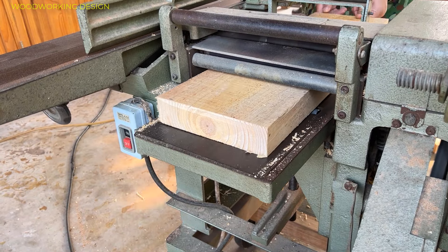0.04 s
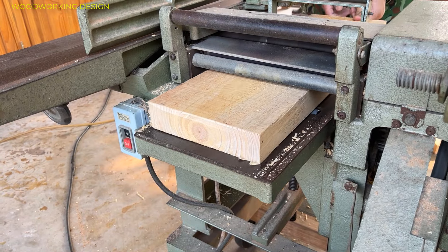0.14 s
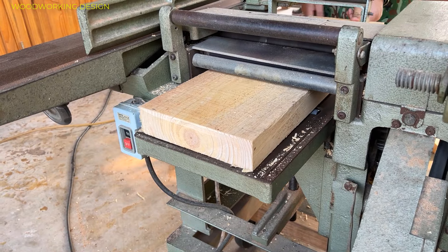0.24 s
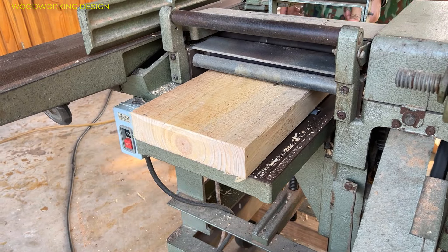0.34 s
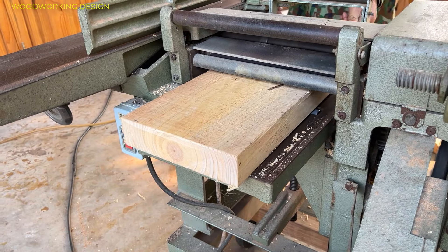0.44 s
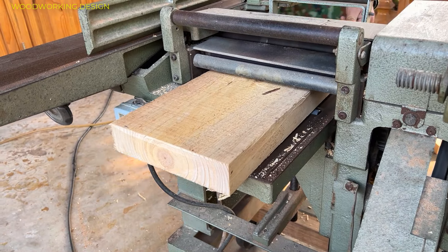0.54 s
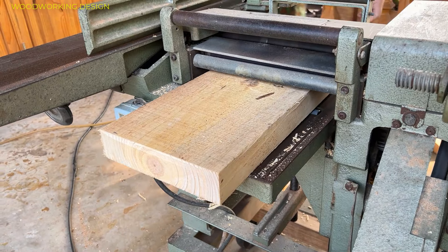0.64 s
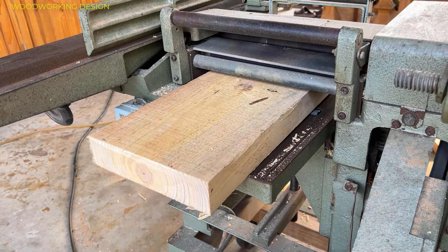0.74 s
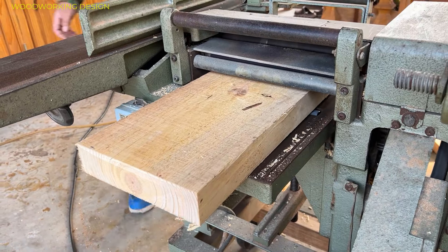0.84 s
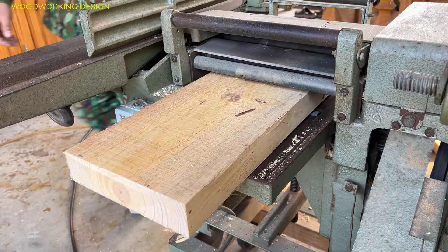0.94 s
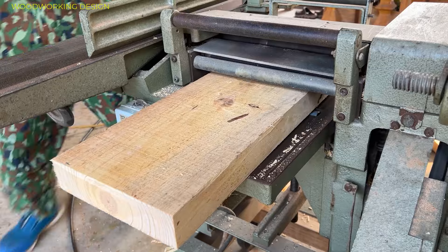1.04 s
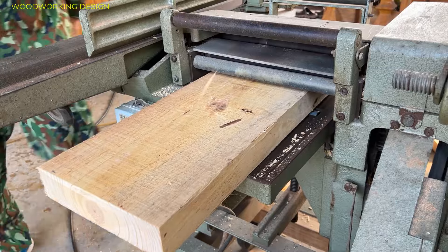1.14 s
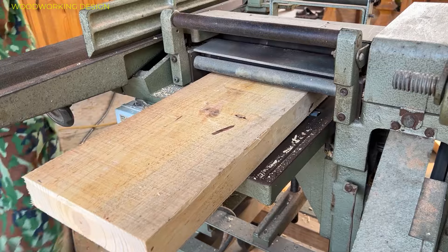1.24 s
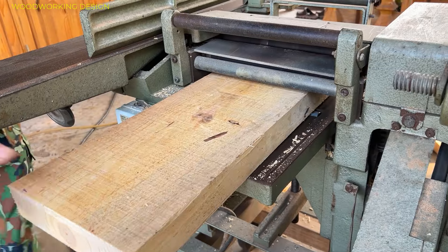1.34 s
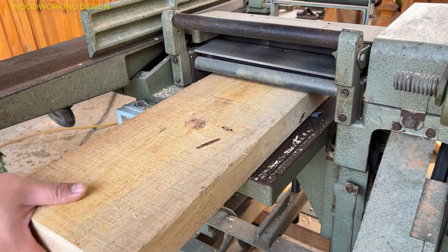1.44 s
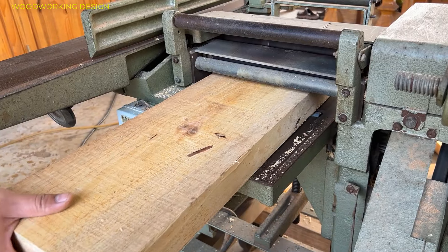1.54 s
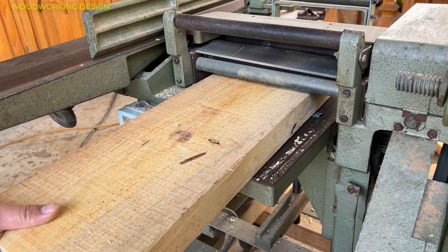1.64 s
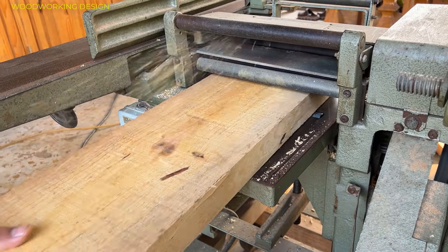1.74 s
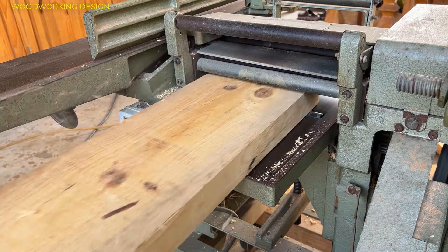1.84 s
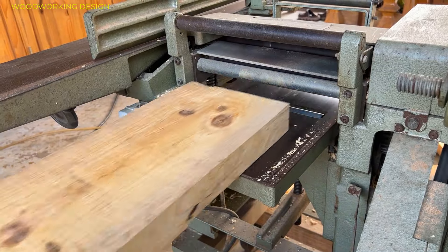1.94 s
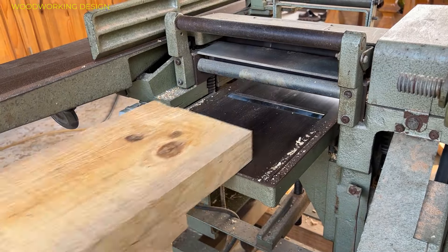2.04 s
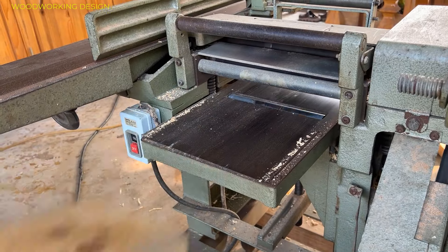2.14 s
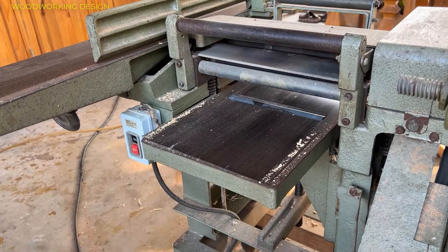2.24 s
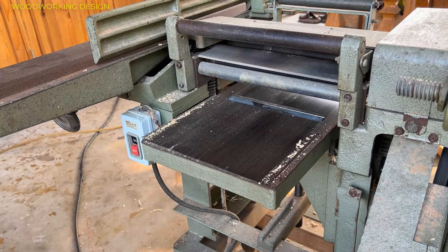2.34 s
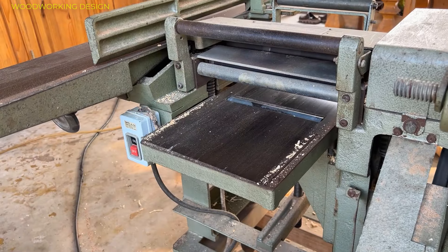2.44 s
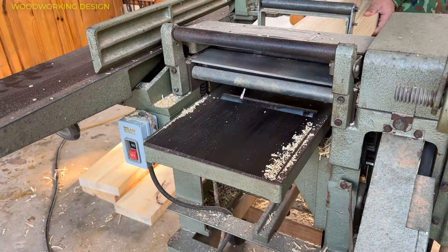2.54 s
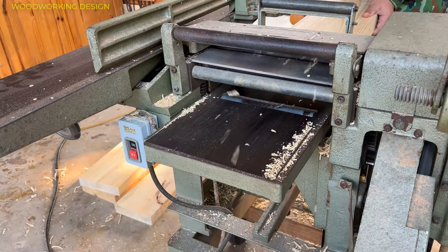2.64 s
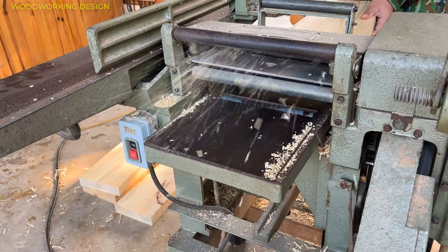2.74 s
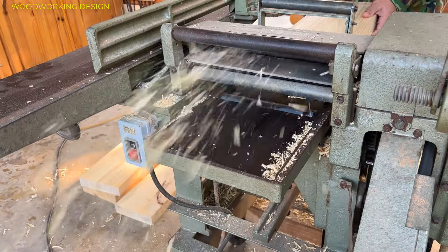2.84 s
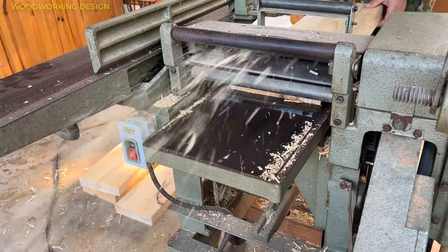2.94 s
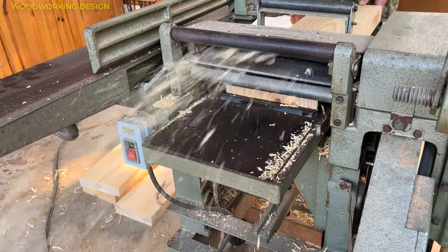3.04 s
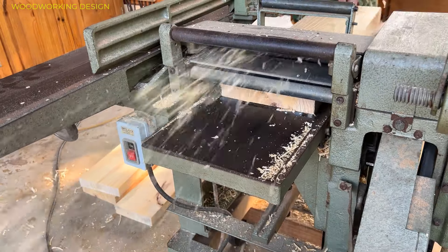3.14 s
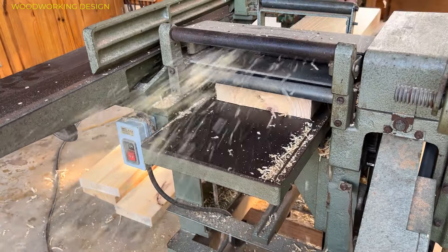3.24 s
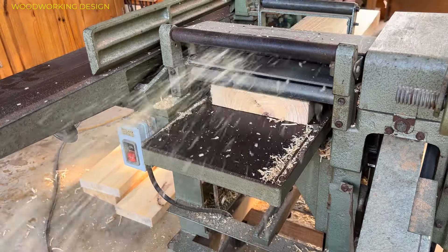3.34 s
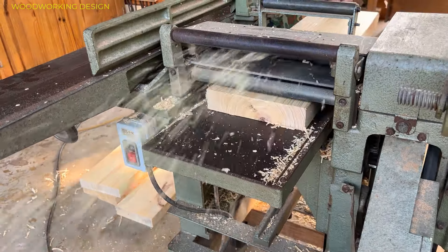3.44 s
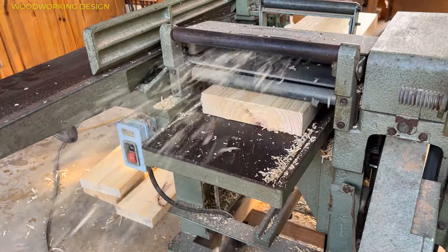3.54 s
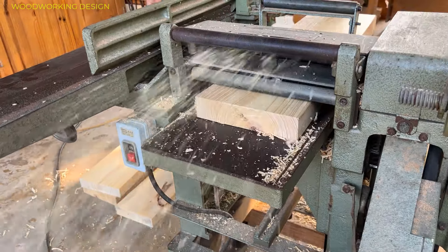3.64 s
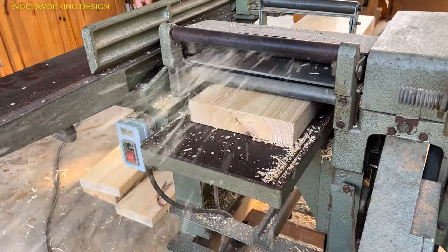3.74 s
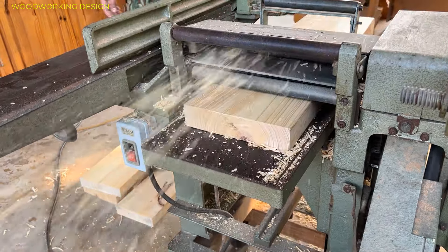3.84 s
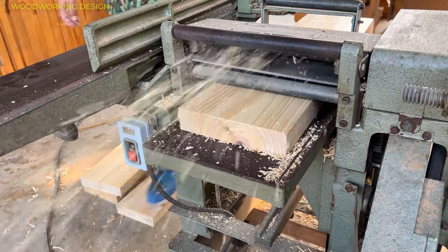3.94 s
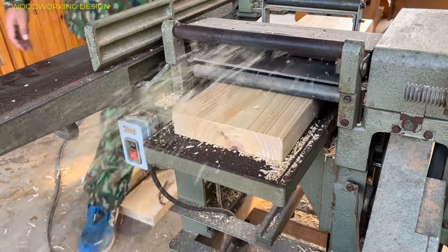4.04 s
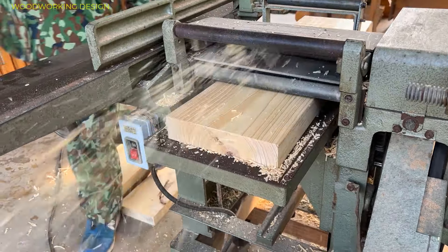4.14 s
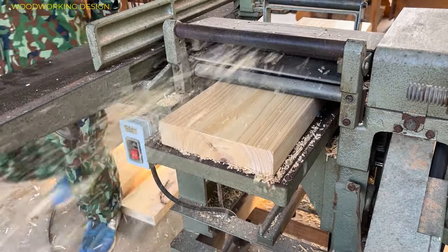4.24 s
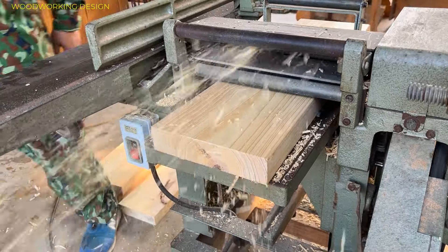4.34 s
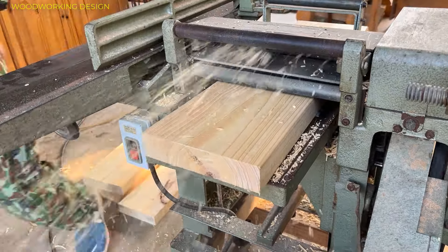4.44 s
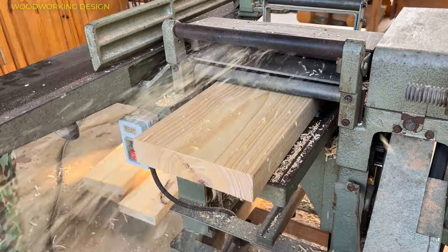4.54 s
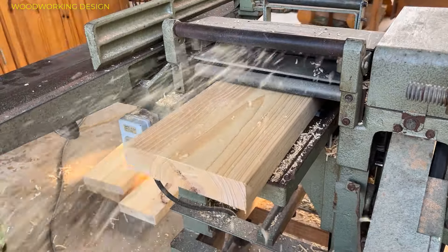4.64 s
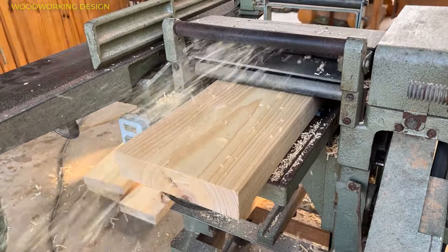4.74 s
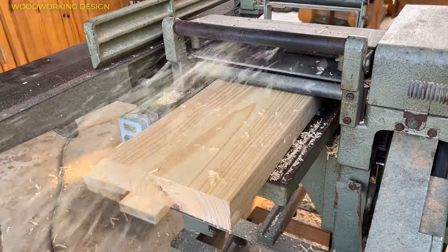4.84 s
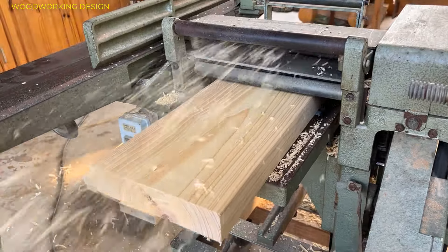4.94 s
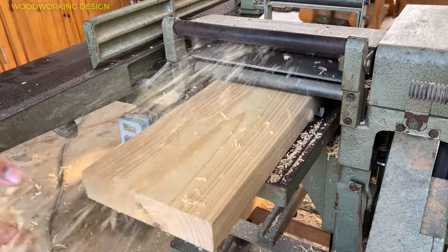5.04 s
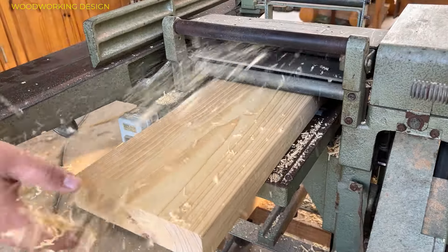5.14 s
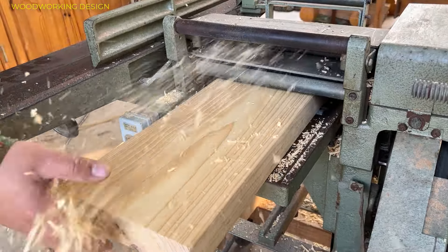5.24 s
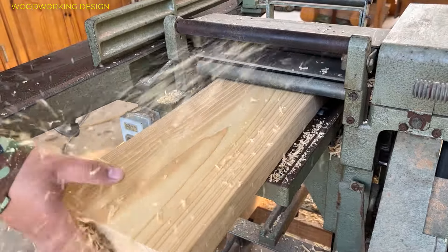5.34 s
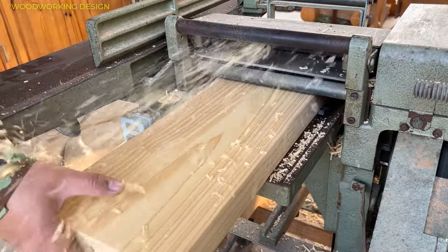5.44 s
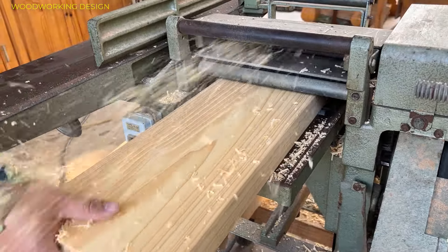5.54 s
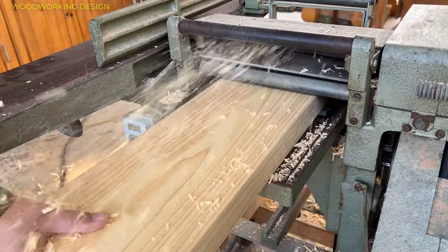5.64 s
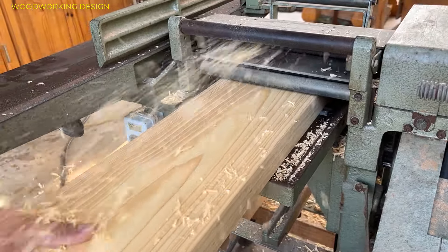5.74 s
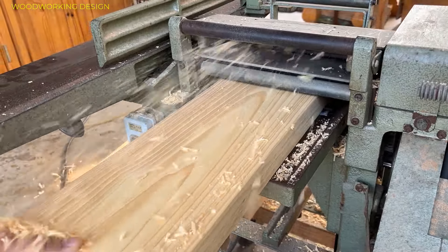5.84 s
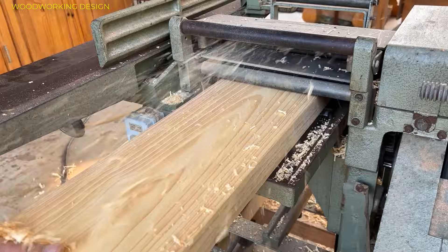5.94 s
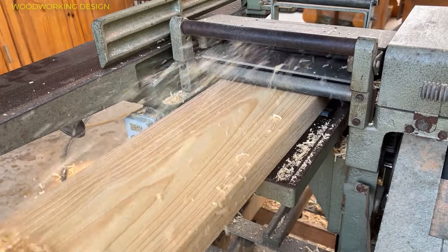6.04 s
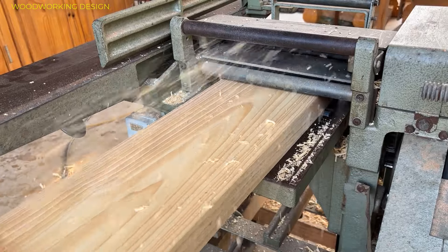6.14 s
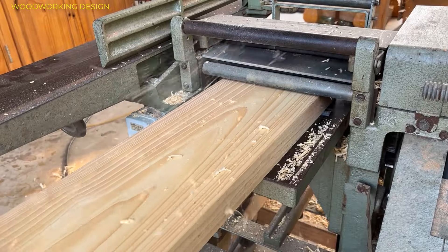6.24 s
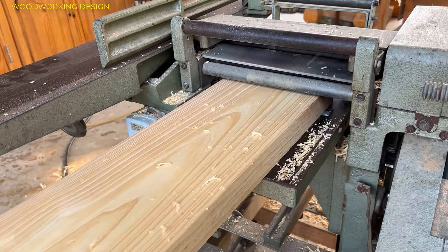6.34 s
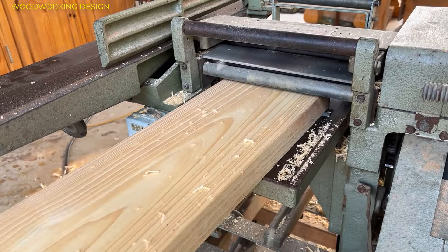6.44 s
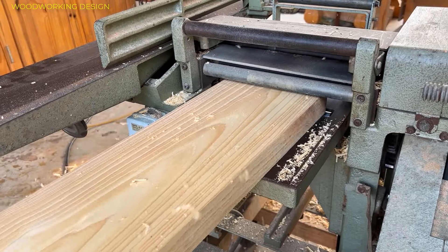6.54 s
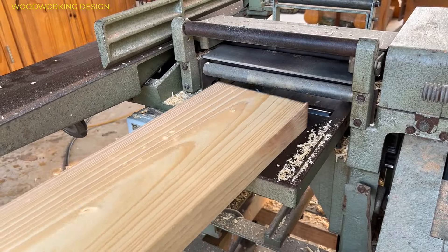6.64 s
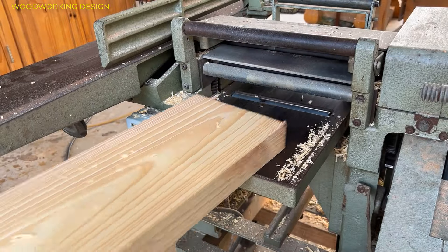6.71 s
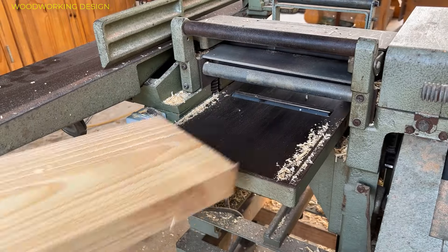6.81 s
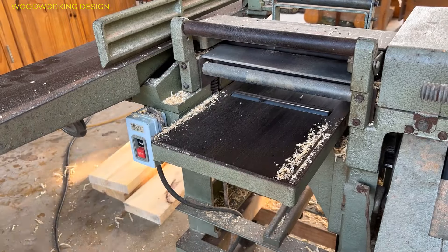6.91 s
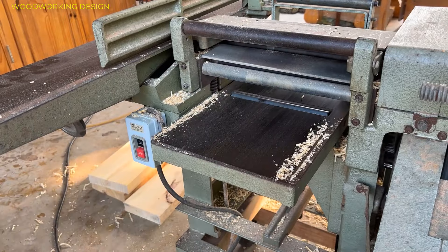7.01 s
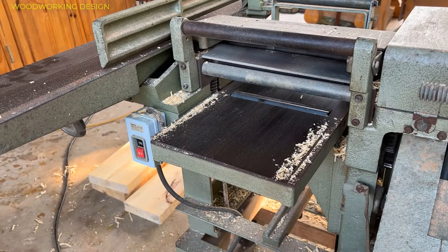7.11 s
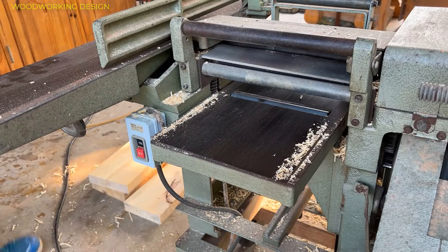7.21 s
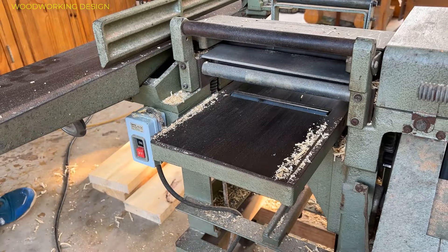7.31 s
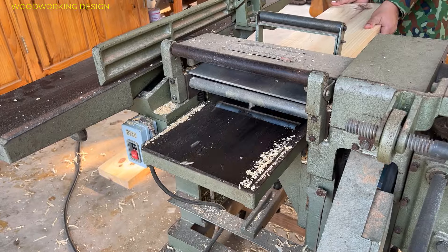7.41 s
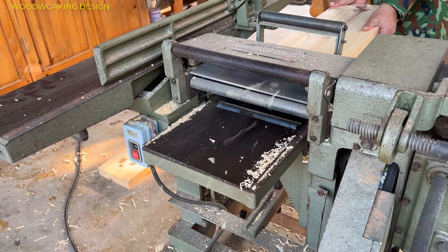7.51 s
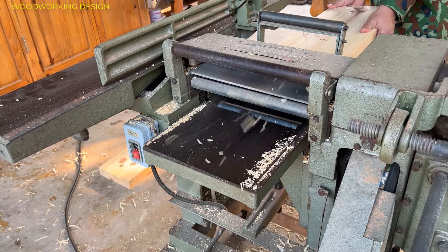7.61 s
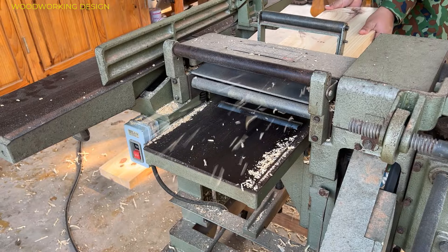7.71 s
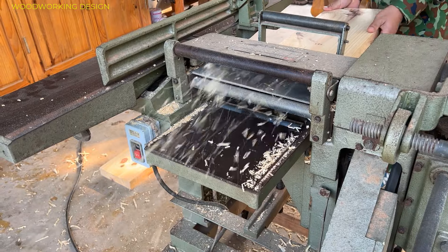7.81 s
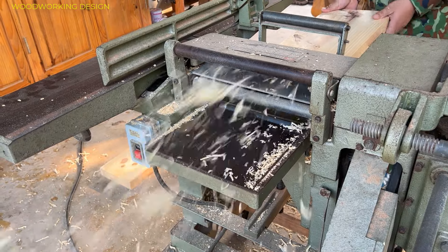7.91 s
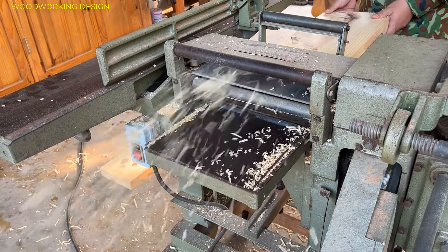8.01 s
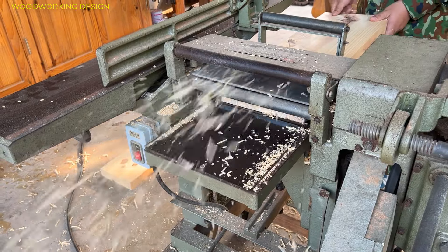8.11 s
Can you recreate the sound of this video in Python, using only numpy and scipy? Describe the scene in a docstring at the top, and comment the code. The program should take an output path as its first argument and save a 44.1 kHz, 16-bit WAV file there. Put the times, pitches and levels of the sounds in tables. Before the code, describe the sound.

Close, fairly dry stereo sound of a thickness planer. From 0 to 1.7 s a steady hard whine, about 360 hertz with buzzing overtones, singing gears and broad roar, carries a light skim with faint crisp nicks. At 1.75-1.87 s the board end stutters and scrapes off the roller, with a sharp low thump on the table at 1.85. The knives then whine freely until an abrupt tiny silence at 2.6. The whine returns stronger, and at 2.77 the knives bite: loud, rough chattering, slightly lower in pitch, with spraying chips and shifting woody rings, until 5.9. The tail turns brighter and harsher, ends with a short snarl around 6.2, and drops to a softer free-running whine from 6.3. Another tiny silence falls at 7.4; the whine resumes, and at 7.8 a new loud, tearing cut begins and continues to the end near 8 s.

```python
"""A hard whine and chattering bite of a four-knife thickness planer, close by, in three stretches split by silences.
The knives whine in the air as wavering sines; in wood each blow is a filtered click that sprays bursts of chip noise
and rings the board, while the load slows the shaft. The feed gears sing as sines locked to their mesh rate, the motor
adds two high pairs of tones, and shaped noise roars behind. A board leaving the rollers scrapes and thumps on the
table, both as struck decaying modes."""
import sys
import numpy as np
from scipy import signal
from scipy.fft import rfft, irfft
from scipy.io import wavfile
from scipy.ndimage import uniform_filter1d, map_coordinates

SR = 44100
rng = np.random.default_rng(int(sys.argv[2]) if len(sys.argv) > 2 else 0)


def generate_wav(sig):
    """Save sig (samples, or channels by samples) to the path in sys.argv[1] as 16-bit PCM at SR."""
    pcm = np.round(np.clip(np.atleast_2d(sig).T, -1, 1) * 32767).astype(np.int16)
    wavfile.write(sys.argv[1], SR, pcm)


N = 360297

# the planer's work in order: (time [s], state, change-over [s], level added to every layer [dB])
STAGES = [(0, "skim", 0.057, 2), (1.745, "exit", 0.024, -0.5), (1.861, "idle", 0.057, -1),
          (2.609, "feed", 0.027, 0), (2.764, "cut", 0, 7), (5.884, "tail", 0, -2),
          (6.21, "last", 0.023, 0.5), (6.275, "coast", 0.048, -10), (7.41, "feed", 0.0088, -3.5),
          (7.785, "cut", 0.0052, 6.5)]
# silences between stretches: (start [s], end [s])
DROPOUTS = [(2.602, 2.6258), (7.403, 7.4253)]


def gain_of(db):
    """Amplitude factor of a level in dB."""
    return 10 ** (np.asarray(db) / 20)


def evened(x):
    """Scales a signal to an RMS of one."""
    return x / np.sqrt(np.mean(x ** 2) + 1e-20)


def read(points, hz):
    """Reads a table over frequency, straight between points on a log axis."""
    f, value = np.transpose(points)
    return np.interp(np.log(hz + 1), np.log(f + 1), value)


def curves(rows):
    """Turns the columns of a timed table into one value a sample."""
    s, *columns = np.transpose(rows)
    return [np.interp(np.arange(N) / SR, s, c) for c in columns]


def coloured(x, points):
    """Minimum-phase filter: it has the given spectrum and never sounds ahead of a blow."""
    hz = abs(np.fft.fftfreq(4096, 1 / SR))
    log_gain = np.log(gain_of(np.maximum(read(points, hz), -100)))
    taps = np.fft.ifft(np.exp(np.conj(signal.hilbert(log_gain)))).real[:2048]
    return signal.oaconvolve(x, taps[None], axes=1)[:, :N]


def noise(points, patchy_db):
    """Two partly alike channels of shaped noise, with drifting louder and softer patches."""
    # (frequency [Hz], left-right likeness [0-1])
    likeness = [(60, 1), (150, 1), (300, 1), (700, 0.68), (1600, 0.088), (4000, 0.65), (8000, 0.079),
                (15000, 0.088)]
    frames, hz = N // 256 + 5, np.fft.rfftfreq(1024, 1 / SR)
    a, b, c, d, patches = rng.standard_normal((frames, 513, 5)).T
    patches = uniform_filter1d(patches, size=12, axis=0)
    patches = evened(uniform_filter1d(patches, size=14, axis=1))
    same = np.clip(read(likeness, hz), -1, 1)[:, None]
    left = a + 1j * b
    right = same * left + np.sqrt(1 - same ** 2) * (c + 1j * d)
    spectra = np.array([left, right]) * gain_of(read(points, hz)[:, None] + patchy_db * patches)
    return evened(signal.istft(spectra, nperseg=1024, noverlap=768)[1][:, :N])


def tones(cycles, orders, waver_db, count):
    """Sines at multiples of a rate, each wavering at random; high multiples reach the two ears out of step."""
    out, knots = np.zeros((2, N)), np.linspace(0, N, num=count)
    for i, (k, db) in enumerate(orders):
        waver = np.interp(np.arange(N), knots, rng.standard_normal(count))
        ear_step = [[0], [.008 * k * (-1) ** i]]  # share of a cycle
        phase = 2 * np.pi * (k * cycles + .3 * i * i + ear_step)
        out += gain_of(db + waver_db * waver) * np.cos(phase)
    return np.sqrt(2) * out


def reflected(x):
    """Adds reflections whose paths swing by a millisecond as the board travels; each ear has its own lengths."""
    # off the moving board and the table:
    # (shortest delay [ms], left-right difference [ms], drift [ms per s], level [dB])
    echoes = [(0.695, 0.1, .3, -8), (1.302, -0.049, -.5, -8), (2.095, 0.13, .7, -6),
              (3.198, -0.232, -.4, -8.5), (4.605, 0.29, .9, -11.5), (6.501, -0.42, -.7, -5.5)]
    n, out = np.arange(N), np.array([x, x])
    for ms, apart, drift, db in echoes:
        swing = abs((drift * n / SR + ms) % 2 - 1)
        for ear, side in zip(out, (-.5, .5)):
            delay = (ms + side * apart + swing) * SR / 1000  # samples
            ear += gain_of(db) * map_coordinates(x, [n - delay], order=1)
    return out


def struck(events, modes, rise_s):
    """Rings one set of decaying modes at each timed event."""
    t, hits = np.arange(SR // 3) / SR, np.zeros(N)
    ring = sum(gain_of(db - 60 * t / t60) * np.sin(2 * np.pi * hz * t) for hz, db, t60 in modes)
    ring *= 1 - np.exp(-t / rise_s)
    for s, db in events:
        hits[round(s * SR)] = gain_of(db)
    return signal.oaconvolve(hits, ring / abs(ring).max())[:N]


def layer_levels():
    """Level of every layer in dB: each stage cross-fades to its state, then drifts; grain and dips ride on top."""
    # base levels as a state begins: (whine, board knock, edge bite, chips, lower rotor pair, upper rotor pair,
    # whine overtones, hum of the long knives, feed gear, roar) [dB]
    state_levels = {"skim": (-37.5, -27.5, -65, -52.5, -56, -58, -31, -71, -41, -34),
                    "exit": (-34, -26, -29.5, -32.5, -60, -56, -24.5, -58, -40, -28.5),
                    "idle": (-32, -32.5, -84, -52.5, -55, -60, -32.5, -56.5, -48.5, -36),
                    "coast": (-30.5, -58, -84, -55, -57.5, -62, -30, -58.5, -60, -37.5),
                    "feed": (-27, -22, -27, -42, -44, -45.5, -30.5, -54, -33, -24.5),
                    "cut": (-38.5, -33.5, -31, -33.5, -45, -53, -35.5, -60, -44, -36.5),
                    "tail": (-42, -43, -17.5, -27.5, -38, -62, -29, -67, -47, -26.5),
                    "last": (-38.5, -21, -16.5, -31.5, -38, -43, -33, -61, -60, -35.5)}
    # average drift of the same layers while a state lasts [dB per s]
    state_drifts = {"skim": (1.1, 0.5, -25.5, -20, -5, 1.5, 0, 6.5, 0.5, -0.8),
                    "exit": (4.5, .1, 98, 65, .1, .1, .1, .1, .1, .1),
                    "idle": (-0.1, -17, -16, 2, 1, 2, 2, -9, -10, -2.5),
                    "coast": (-1.7, -27, -16, 1, 6.5, 3, -4, -2.5, -2, -1),
                    "feed": (9.5, 15, 1, 5, -3, .1, 23, -2, 7, 2),
                    "cut": (-4.5, 2.4, 1.41, -1.23, -38, -21, -1.5, -3, -2.5, -2.2),
                    "tail": (9, 4, 26, 5, -7, 8, 17, -4, -10, -25),
                    "last": (4, -30, -96, -55, .1, .1, .1, .1, .1, -30)}
    # the cut wanders with the grain, one table a board: (time [s], whine [dB], knock [dB], bite [dB])
    grain = [
        [(2.8, -7, -4, 9), (2.88, -2.5, 10, 1.5), (3.24, -1.5, -13, -2.5), (3.46, -2, -15, 8.5),
         (3.81, -1, 2.5, 1), (4.25, 2, -5, 1), (4.73, -4.5, -8, -2), (4.93, -1.5, -9, 3.5),
         (5.49, -3, -1.5, -4.5), (5.88, -2, 2.5, 7)],
        [(7.81, -3.5, 12, 10), (8.17, -2, 11.5, 0.5)],
    ]
    # the machine's level dips briefly: (time [s], half length [s], level [dB])
    dips = [(1.885, 0.043, -8.5), (2.763, 0.012, -7), (5.934, 0.018, -2)]
    rows = []
    ends = [row[0] for row in STAGES[1:]] + [N / SR]
    for (s, state, change, db), end in zip(STAGES, ends):
        begin = np.array(state_levels[state]) + db
        drift = np.array(state_drifts[state]) * (end - s - change)
        rows += [(s + change, *gain_of(begin)), (end, *gain_of(begin + drift))]
    levels, t = 20 * np.log10(curves(rows)), np.arange(N) / SR
    for board in grain:
        in_cut = (t > board[0][0]) & (t < board[-1][0])
        levels[:3] += np.array(curves(board)) * in_cut
    for s, half, db in dips:
        levels += db * np.maximum(1 - abs(t - s) / half, 0)
    return levels


def shaft():
    """Knife and gear rates in Hz, slowed with inertia by the load, and how the knives share the cut."""
    # the cutterhead in each state: (short knives [0-1], second long knife [0-1], knives in wood [0-1],
    # knife rate lost [Hz], lost further [Hz per s])
    loads = {"skim": (.58, .95, 1, 0, 0), "exit": (.4, .9, 1, 0, 0), "idle": (.9, 1, 0, 0, 0),
             "feed": (.8, .9, 0, .9, 0), "cut": (.14, .9, 1, 8.9, .7), "tail": (.08, .33, 1, 9.4, -2),
             "last": (.25, .85, 1, 4, -40), "coast": (.9, 1, 0, 0, 0)}
    # unloaded, one row a stretch: (knife passes [Hz], gear mesh [Hz])
    free_rates = [(359.9, 325.3), (357.7, 323.8), (357.6, 323.5)]
    mesh_sag, settle_s = .53, .054  # the gears lose this share of the knives' loss; time constant of the shaft
    t, starts = np.arange(N) / SR, np.array([row[0] for row in STAGES])
    now = np.searchsorted(starts, t, "right") - 1
    short, second, wood, lost, creep = np.array([loads[row[1]] for row in STAGES])[now].T
    keep = np.exp(-1 / (settle_s * SR))
    lost = signal.lfilter([1 - keep], [1, -keep], lost + creep * (t - starts[now]))
    stretch = np.searchsorted([start for start, end in DROPOUTS], t)
    rates = np.array(free_rates)[stretch].T - np.outer([1, mesh_sag], lost)
    return rates, uniform_filter1d([short, second, wood], size=900, axis=1)


def blows(passes, short, second):
    """One click placed between samples at each knife pass; the four knives are not set equally high."""
    at = np.flatnonzero(np.diff(np.floor(passes)) > 0)
    exact = at + (np.floor(passes[at + 1]) - passes[at]) / (passes[at + 1] - passes[at])
    knife = np.floor(passes[at + 1]).astype(int) % 4
    height = np.choose(knife, [np.ones(len(at)), short[at], second[at], short[at]])
    scatter_db = .6 + 1.5 * (1 - second[at])  # a loose board end makes the blows uneven
    size = height * gain_of(scatter_db * np.clip(rng.standard_normal(N)[at], -1.5, 1.5))
    size /= np.sqrt(1 + 2 * short[at] ** 2 + second[at] ** 2)
    place = at[:, None] + np.arange(-7, 9)
    offset = place - exact[:, None]
    out = np.zeros(N + 16)
    np.add.at(out, place, -size[:, None] * np.sinc(offset) * np.cos(np.pi * offset / 18) ** 2)
    return out[:N]


def machine_roar(level_db):
    """Broad, gently patchy noise behind the tones."""
    # (frequency [Hz], relative level per Hz [dB])
    roar_spectrum = [(24, -81), (40, -28.5), (298, -15), (355, -16.5), (412, -13.5), (710, -8), (824, -8.5),
                     (1420, -7), (1530, -3), (1780, -3), (6780, -19), (12600, -31), (15000, -30)]
    return gain_of(level_db) * noise(roar_spectrum, patchy_db=1.2)


def motor_rotor(passes, lower_db, upper_db):
    """Two pairs of high rotor tones that follow the knife rate."""
    # lower pair, then upper pair: (multiple of the knife rate, relative level [dB])
    rotor_pairs = [
        [(18.41, 0), (19.41, -5)],
        [(21.11, -6), (22.11, 0)],
    ]
    levels = zip((lower_db, upper_db), rotor_pairs)
    return sum(gain_of(db) * tones(passes, pair, waver_db=1.5, count=60) for db, pair in levels)


def feed_gears(mesh, level_db):
    """The meshing teeth sing at multiples of their rate, with a fast waver."""
    # (multiple of the mesh rate, relative level [dB])
    gear_orders = [(2, -9.5), (3, -11.5), (4, -13.5), (6, -4.5), (7, -6.5), (8, 0)]
    return gain_of(level_db) * tones(mesh, gear_orders, waver_db=3.8, count=450)


def table_thumps():
    """The board thumps on the table and rings its low, short modes."""
    # (time [s], level [dB])
    thumps = [(1.833, -19), (1.849, -6.5), (1.934, -23.5), (1.953, -32), (2.629, -36), (2.769, -37),
              (2.909, -39), (5.889, -44), (5.979, -38), (6.209, -38.5), (7.791, -47)]
    # (frequency [Hz], relative level [dB], 60 dB decay [s])
    table_modes = [(97, 0, 0.21), (141, 12.5, 0.059), (207.5, 12.5, 0.037), (263, 5.5, 0.055),
                   (314, 1, 0.059), (488, 12, 0.019), (600, 18, 0.0046)]
    return struck(thumps, table_modes, rise_s=0.0021)


def roller_scrape():
    """The board end catches and slips off the roller, ringing its modes along with reflections."""
    # single catches around the stutter: (time [s], relative level [dB])
    catches = [(1.7759, -7), (1.8477, -4.5), (1.8664, -18)]
    # the stutter: (start [s], end [s], gap [s], relative level [dB])
    stutter = (1.785, 1.845, .0062, -15)
    # (frequency [Hz], relative level [dB], 60 dB decay [s])
    roller_modes = [(2153, -4, 0.059), (2960, -1, 0.014), (4280, 2.5, 0.01), (5850, -2.5, 0.01),
                    (8950, -10, 0.0033)]
    start, end, gap, db = stutter
    at = np.arange(start, end, gap)
    chance = rng.standard_normal((len(at), 2))
    times = at + .2 * gap * chance[:, 0]  # scatter as a share of a gap
    slips = list(zip(times, db + 2.5 * chance[:, 1]))  # scatter in dB
    return gain_of(-6.0) * reflected(struck(catches + slips, roller_modes, rise_s=0.0001))


def board_rings(clicks, width_hz):
    """The blows ring each board mode while it swells and fades; high modes reach the two ears out of step."""
    # modes that light up while that part of the board is under the knives:
    # (time [s], length [s], frequency [Hz], level [dB])
    board_modes = [(-.5, 2.13, 1464, -30), (-.3, 1.1, 1815, -29.5), (-.3, 1.06, 2200, -30.5),
                   (.9, 0.74, 2150, -42.5), (1.4, 0.46, 1090, -37), (1.5, 0.35, 1740, -33),
                   (2.77, .33, 1930, -26), (2.8, 0.28, 1106, -27), (2.84, 0.54, 4000, -31),
                   (2.92, 0.32, 3200, -34), (2.96, 0.32, 2430, -27.5), (3.13, 0.49, 855, -32),
                   (3.23, 0.45, 3640, -24), (3.33, .29, 3380, -36.5), (3.37, 0.15, 4340, -27),
                   (3.1, 0.94, 1387, -36), (3.41, .2, 4800, -34), (3.6, 0.28, 5050, -34),
                   (3.51, 0.56, 2420, -32), (3.79, 0.46, 3150, -33.5), (3.84, 0.4, 1750, -36),
                   (3.85, 0.23, 6100, -45), (3.98, 0.32, 3720, -27.5), (3.95, 0.88, 2262, -33.5),
                   (4.08, .31, 4470, -32), (4.22, 0.34, 4990, -31), (3.4, 2.1, 1060, -38.5),
                   (4.3, 0.3, 3250, -37), (4.43, 0.44, 1210, -36), (4.48, 0.37, 3828, -37),
                   (4.4, 0.7, 3450, -35.5), (4.7, 1.17, 1610, -32), (4.79, 0.51, 4330, -32),
                   (4.81, 0.42, 3120, -35.5), (4.8, 0.23, 6200, -39), (4.99, 0.57, 875, -37),
                   (5.1, .8, 1890, -30.5), (5.17, 0.28, 3306, -33.5), (5.25, 0.27, 4640, -34),
                   (5.65, 0.26, 698.6, -33.5), (5.7, 0.2, 6100, -31), (5.71, 0.2, 4460, -28),
                   (5.74, 0.2, 3490, -30.5), (5.72, 0.44, 2250, -34), (5.92, 0.15, 1780, -36),
                   (5.9, 0.28, 1060, -38.5), (5.97, 0.21, 3720, -29), (5.95, .27, 4250, -34),
                   (6.04, 0.18, 4800, -38), (6.22, .08, 2252, -34), (7.79, 0.17, 1914, -29),
                   (7.8, .12, 4400, -30), (7.82, 0.27, 1146, -30), (7.86, 0.22, 3880, -32),
                   (7.86, .1, 6560, -30), (7.94, .23, 2340, -26), (7.95, 0.15, 1880, -29.5),
                   (7.98, 0.18, 3306, -32)]
    out = np.zeros((2, N))
    for k, (start, length, hz, db) in enumerate(board_modes):
        end, fade = start + length, .3 * length
        n = np.arange(round(max(start - fade, 0) * SR), min(round((end + fade) * SR), N))
        pole = np.exp((2j * np.pi * hz - np.pi * width_hz) / SR)
        ring = signal.lfilter([1], np.poly([pole, pole]), clicks[n])
        ring *= np.sqrt(2 / np.mean(abs(ring) ** 2))
        swell = np.interp(n / SR, [start - fade, start + fade, end - fade, end + fade], [0, 1, 1, 0])
        ear_step = np.exp(1j * hz / 3000 * (-1) ** k * np.array([[-.5], [.5]]))
        out[:, n] += gain_of(db) * swell * (ear_step * ring).real
    return out


def flying_chips(clicks, level_db):
    """Fibres tear in a burst of noise after each blow, over a steady spray."""
    # (frequency [Hz], relative level per Hz [dB])
    chip_spectrum = [(900, -40), (2000, 3), (4000, 4.5), (5500, 3), (6500, -0.5), (9000, -4.5), (12000, -1),
                     (16000, -4)]
    burst = signal.lfilter([1], [1, -np.exp(-1 / (0.0014 * SR))], abs(clicks))  # 1.4 ms decay
    spray = (.8 + evened(burst)) * noise(chip_spectrum, patchy_db=1.5)
    return gain_of(level_db - .4) * evened(spray)


def nicks():
    """Brief swells of the snap where the knives graze a high spot of the board for a few turns."""
    # (time [s], added level [dB])
    grazes = [(.025, -45), (.12, -37.5), (.22, -40), (.31, -47), (.35, -40), (.44, -40.5), (1.141, -48),
              (1.33, -43)]
    swell_s = 0.017
    t = np.arange(N) / SR
    return sum(gain_of(db) * np.exp(-((t - s) / swell_s) ** 2) for s, db in grazes)


def knife_blows(clicks, knock_db, bite_db, chips_db):
    """Each blow and its reflections sound as board knock, edge bite and a treble snap that follows the chips."""
    # all three: (frequency [Hz], relative level per Hz [dB])
    knock_spectrum = [(290, -45.5), (500, 2.5), (714, -1), (1230, 2), (1450, -1), (1620, 13.5),
                      (2180, -2.5), (2370, 9), (2630, 8.5), (4000, -26.5), (5200, -44), (8800, -120)]
    bite_spectrum = [(1350, -9), (2300, -27), (2830, 3), (3110, 12), (3850, 18), (5100, 16), (5520, 7.5),
                     (7500, -8.5), (9750, -81), (16500, -120)]
    snap_spectrum = [(3500, -30), (5500, -3), (6500, 0), (8500, -6), (11500, -9), (14000, -16),
                     (16000, -16)]
    paths = reflected(clicks)
    knock = gain_of(knock_db - 12.5) * evened(coloured(paths, knock_spectrum))
    bite = gain_of(bite_db - 11.5) * evened(coloured(paths, bite_spectrum))
    snap_gain = gain_of(chips_db - 1.5) + nicks()
    snap = snap_gain * evened(coloured(paths, snap_spectrum))
    return knock + bite + snap


def knife_whine(passes, whine_db, overtones_db, hum_db):
    """The knives whine at their passing rate and its multiples; the two long knives hum at half the rate."""
    # (multiple of the knife rate, relative level [dB])
    whine_orders = [(1, -0.5), (2, -14.5), (3, -12), (4, -13), (5, -15), (6, -21), (7, -19), (8, -30),
                    (9, -19), (10, -22.5), (11, -58), (12, -48), (13, -27.5), (14, -21), (15, -51),
                    (16, -55), (18, -32)]
    whine = gain_of(whine_db) * tones(passes, whine_orders[:1], waver_db=1.5, count=40)
    hum = gain_of(hum_db) * tones(passes / 2, [(1, 0)], waver_db=.6, count=40)
    overtones = gain_of(overtones_db) * tones(passes, whine_orders[1:], waver_db=2.5, count=30)
    return whine + hum + overtones


def scene():
    """Layers the planer from roar to whine, its tones and blows timed by the shaft."""
    whine_db, knock_db, bite_db, chips_db, lower_db, upper_db, overtones_db, hum_db, gear_db, roar_db = layer_levels()
    rates, (short, second, wood) = shaft()
    passes, mesh = np.cumsum(rates, axis=1) / SR
    clicks = blows(passes, short, second)
    mix = machine_roar(roar_db)
    mix += motor_rotor(passes, lower_db, upper_db)
    mix += feed_gears(mesh, gear_db)
    mix += table_thumps()
    mix += roller_scrape()
    mix += wood * board_rings(clicks, width_hz=300)
    mix += flying_chips(clicks, chips_db)
    mix += knife_blows(clicks, knock_db, bite_db, chips_db)
    return mix + knife_whine(passes, whine_db, overtones_db, hum_db)


def record(dry):
    """Two microphone ports with their own balance and lag, the silences between stretches, then the band limits."""
    # (frequency [Hz], left minus right [dB])
    port_balance = [(60, 2.5), (150, 0), (380, -2.5), (950, -3.5), (2380, -4.5), (5980, -1.5), (15000, -8)]
    low_edge_hz, high_edge_hz, left_lag = 78, 15800, 2  # lag in samples at low frequencies
    hz = np.fft.rfftfreq(N, 1 / SR)
    lean = gain_of(read(port_balance, hz) / 2)
    dry = signal.sosfilt(signal.butter(3, low_edge_hz, "high", fs=SR, output="sos"), dry)
    # the treble arrives more nearly in step
    lag = 2 * np.pi * hz * left_lag / SR * np.exp(-(hz / 9000) ** 2)
    ports = irfft(rfft(dry) * [lean * np.exp(-1j * lag), 1 / lean], N)
    t = np.arange(N) / SR
    off = sum((t > start) & (t < end) for start, end in DROPOUTS)
    gated = ports * uniform_filter1d(1. - off, size=40)
    low_pass = signal.firwin(511, high_edge_hz, window=("kaiser", 9), fs=SR)
    return signal.oaconvolve(gated, low_pass[None], "same")


dry = scene()
out = record(dry)
generate_wav(out)
```